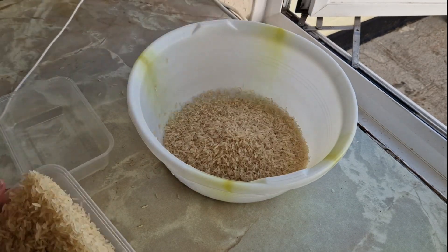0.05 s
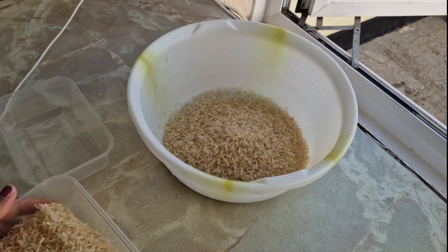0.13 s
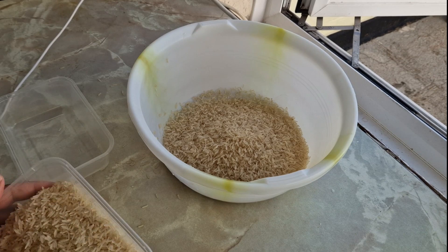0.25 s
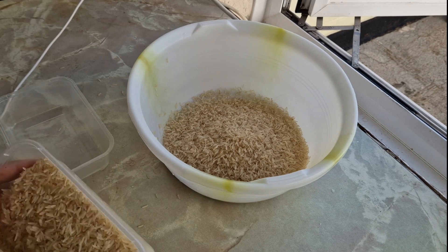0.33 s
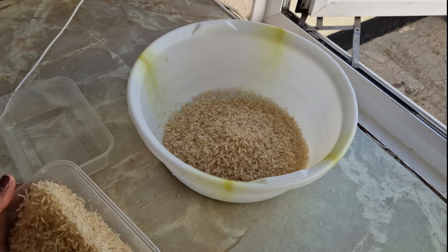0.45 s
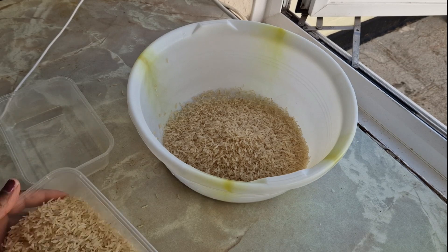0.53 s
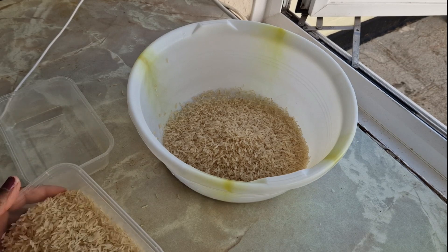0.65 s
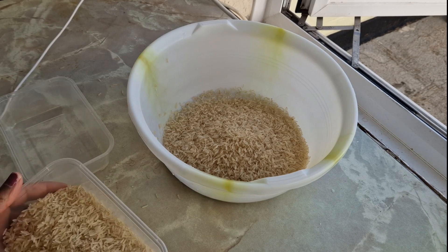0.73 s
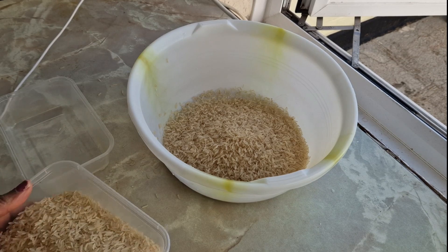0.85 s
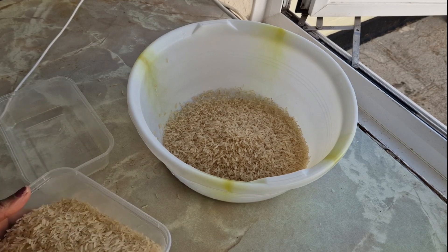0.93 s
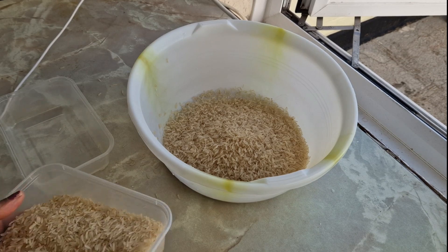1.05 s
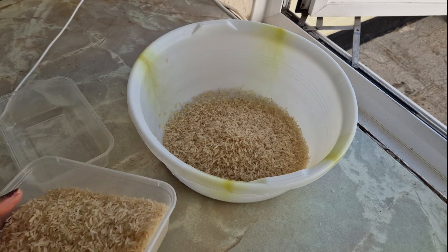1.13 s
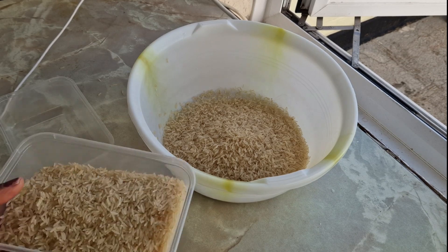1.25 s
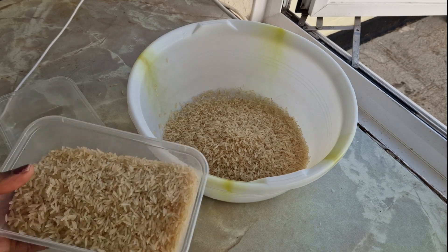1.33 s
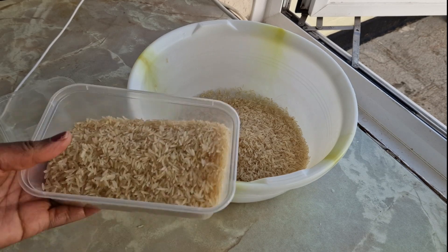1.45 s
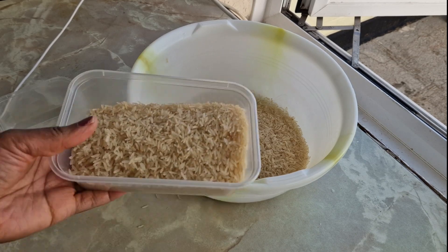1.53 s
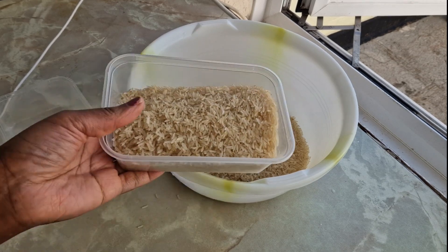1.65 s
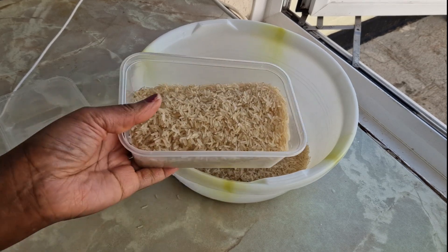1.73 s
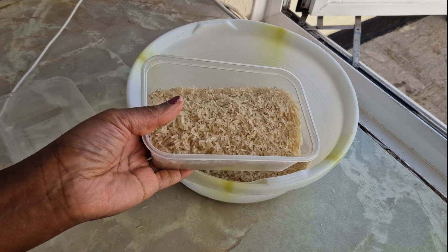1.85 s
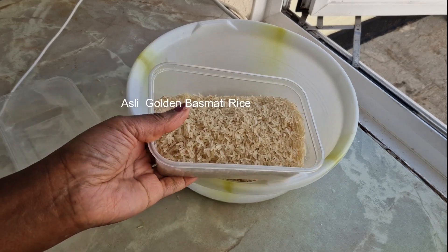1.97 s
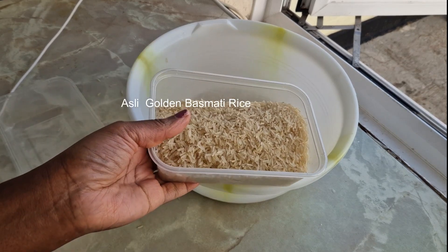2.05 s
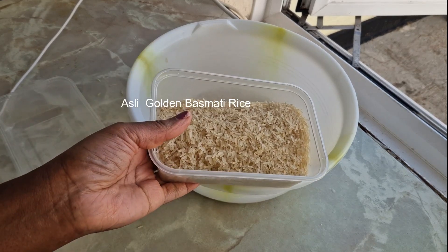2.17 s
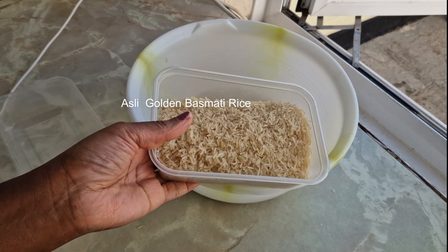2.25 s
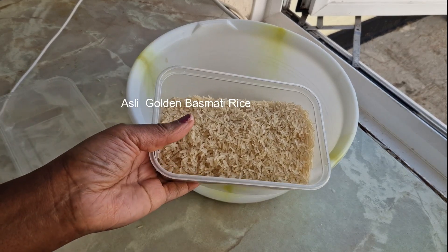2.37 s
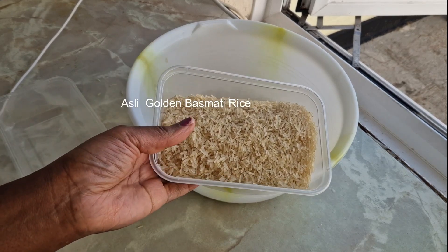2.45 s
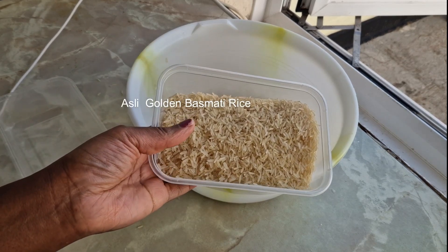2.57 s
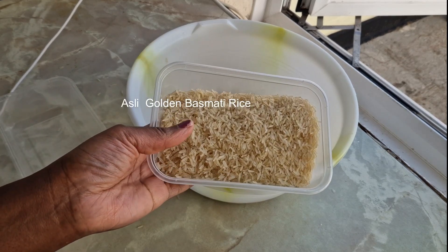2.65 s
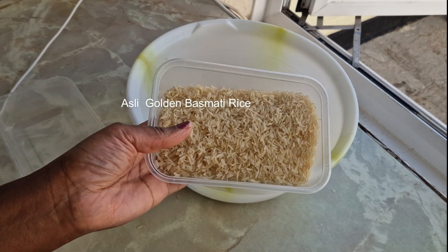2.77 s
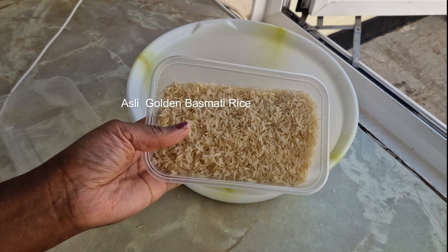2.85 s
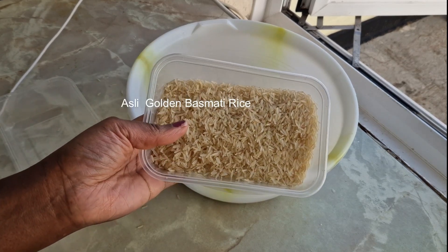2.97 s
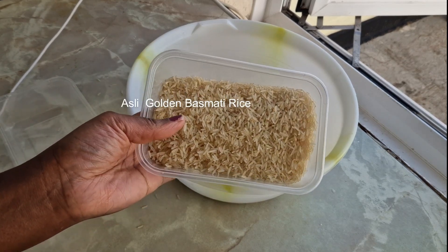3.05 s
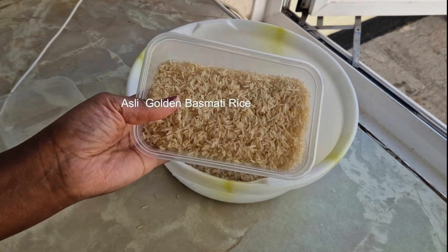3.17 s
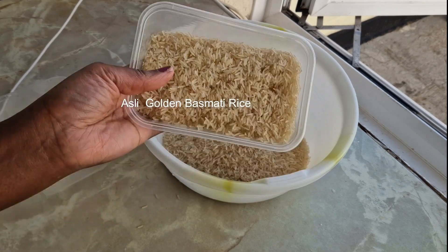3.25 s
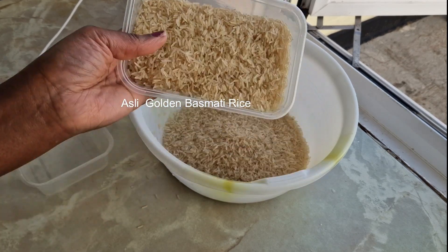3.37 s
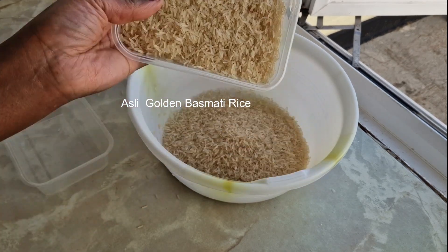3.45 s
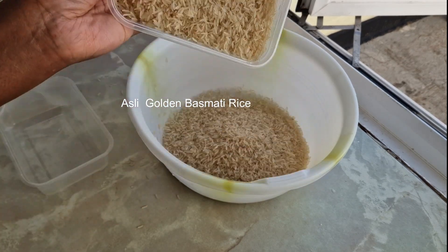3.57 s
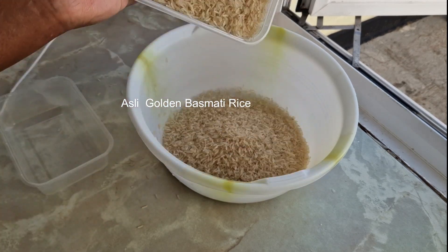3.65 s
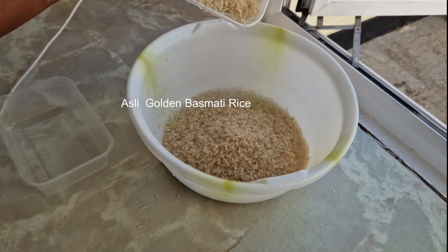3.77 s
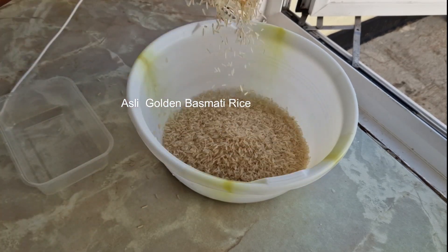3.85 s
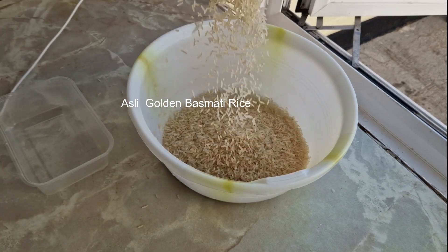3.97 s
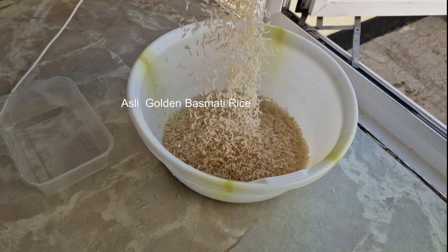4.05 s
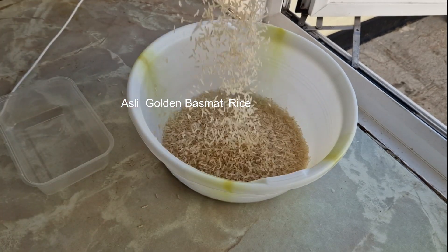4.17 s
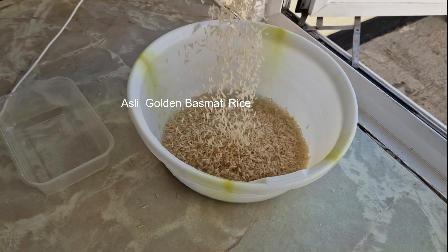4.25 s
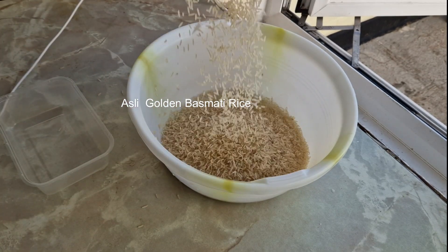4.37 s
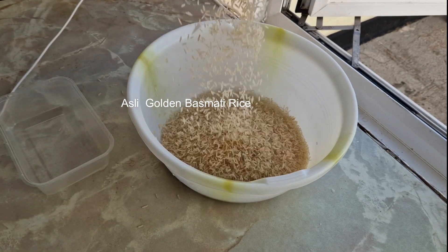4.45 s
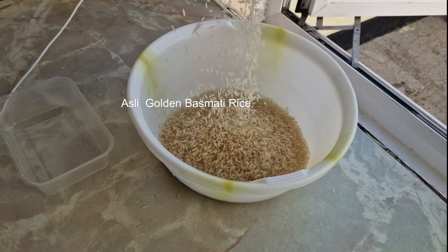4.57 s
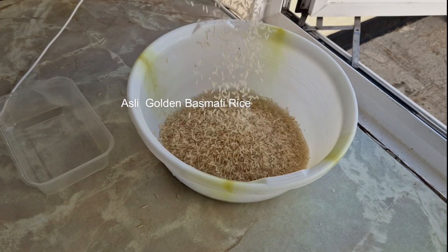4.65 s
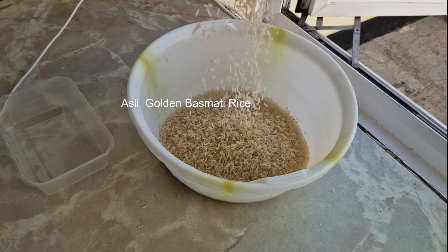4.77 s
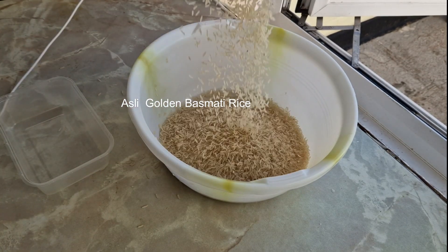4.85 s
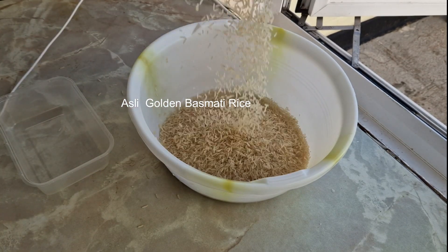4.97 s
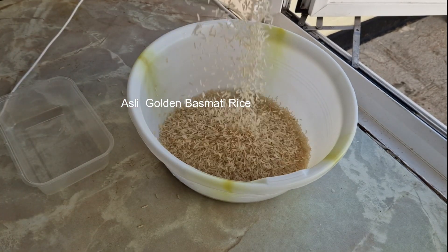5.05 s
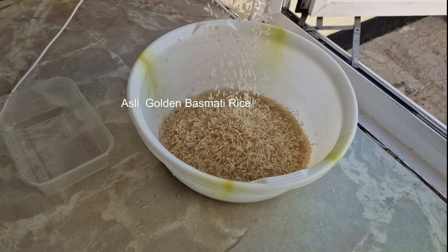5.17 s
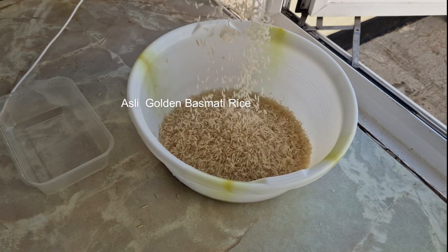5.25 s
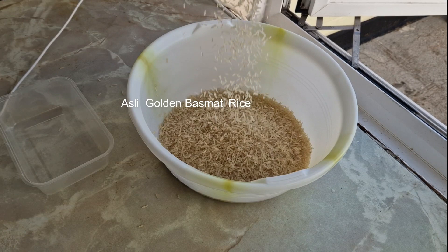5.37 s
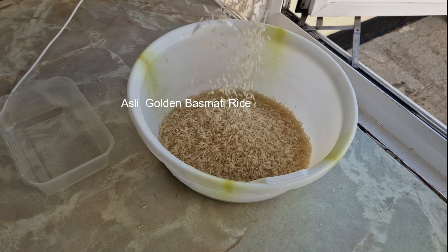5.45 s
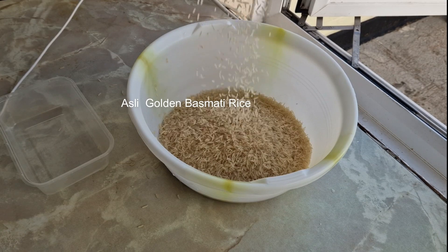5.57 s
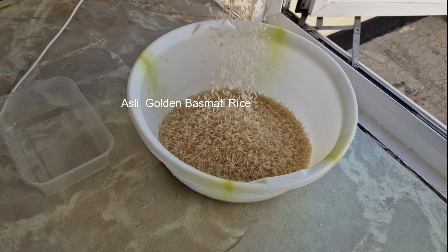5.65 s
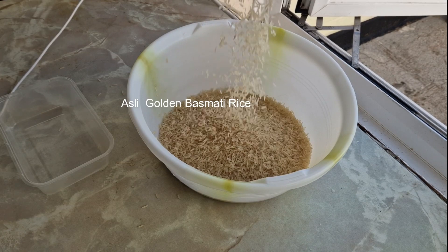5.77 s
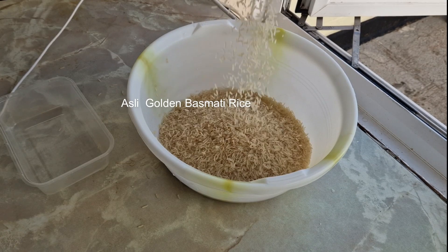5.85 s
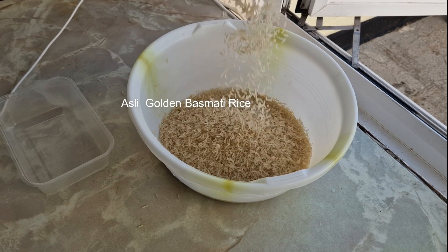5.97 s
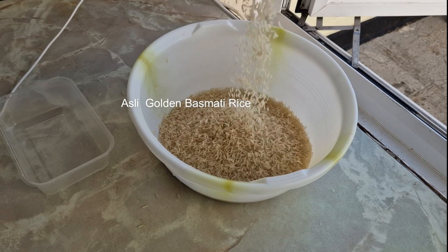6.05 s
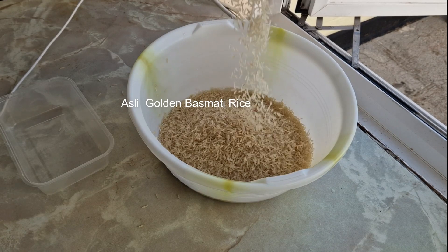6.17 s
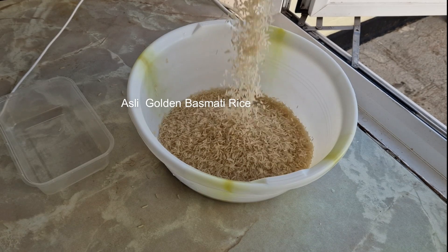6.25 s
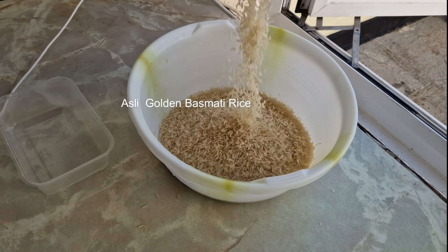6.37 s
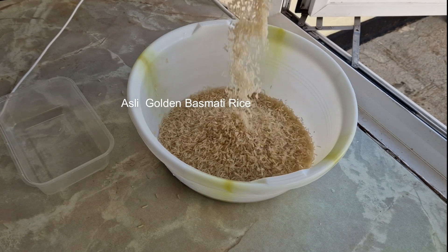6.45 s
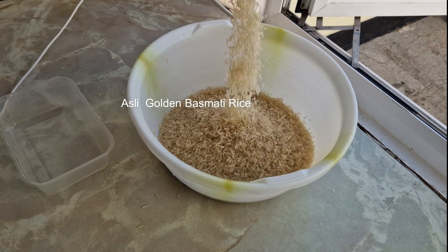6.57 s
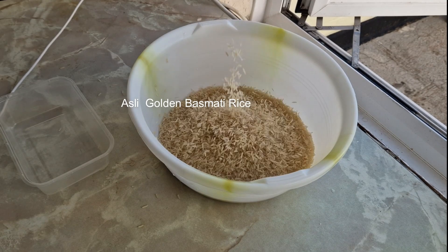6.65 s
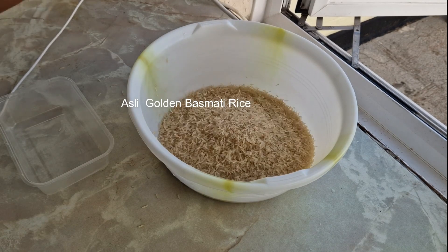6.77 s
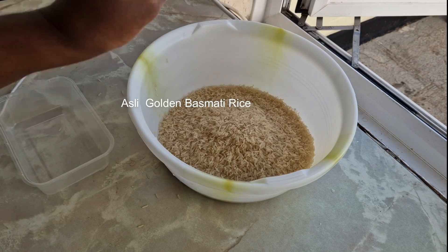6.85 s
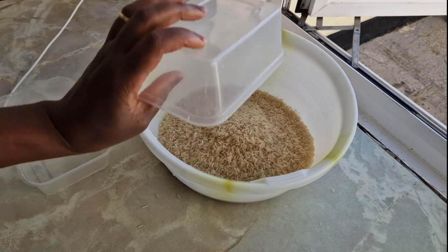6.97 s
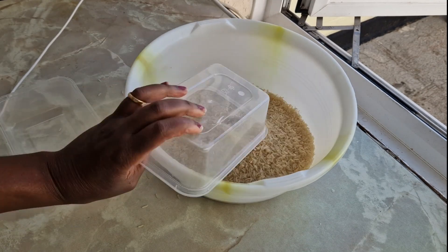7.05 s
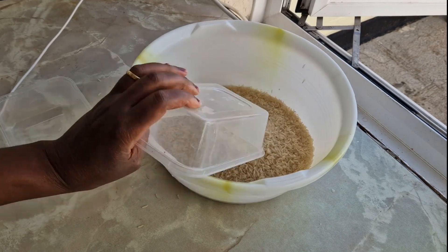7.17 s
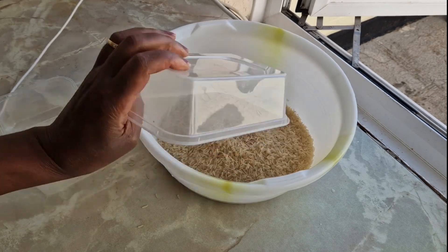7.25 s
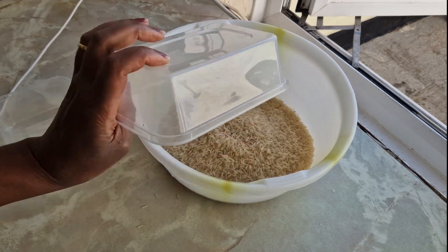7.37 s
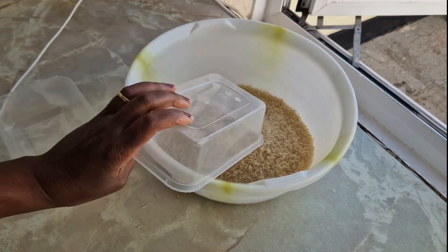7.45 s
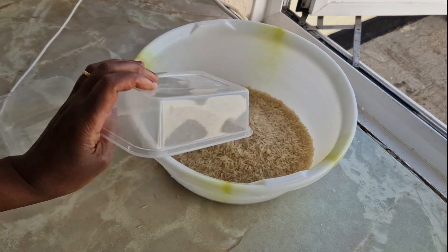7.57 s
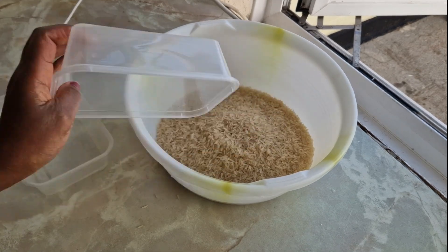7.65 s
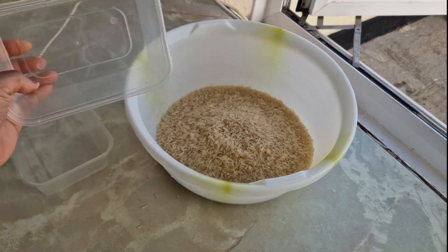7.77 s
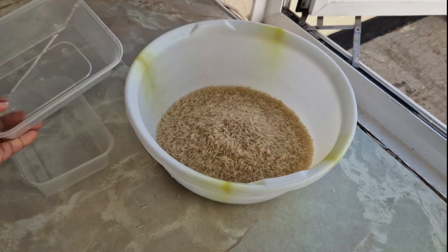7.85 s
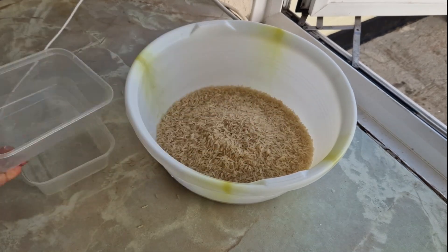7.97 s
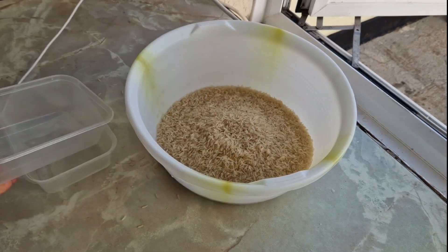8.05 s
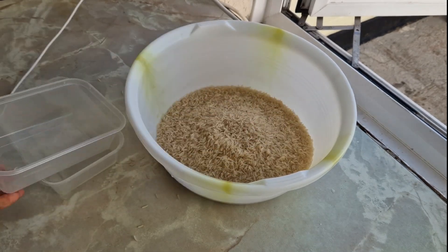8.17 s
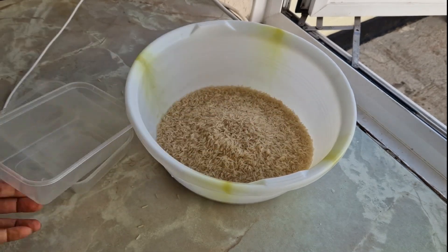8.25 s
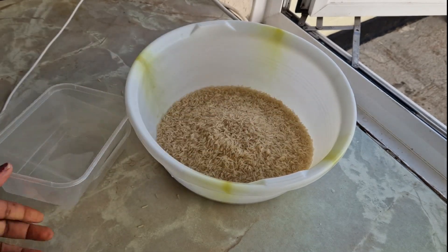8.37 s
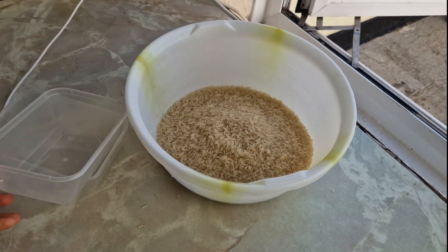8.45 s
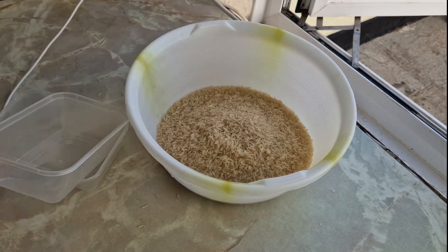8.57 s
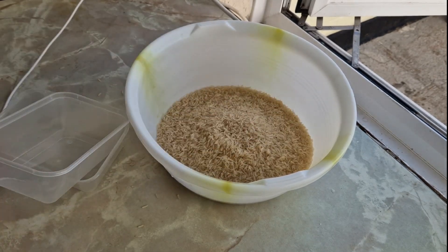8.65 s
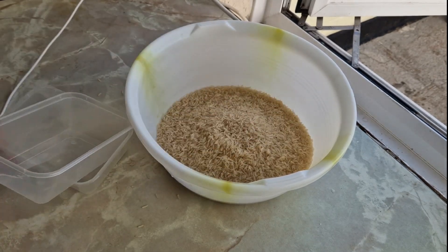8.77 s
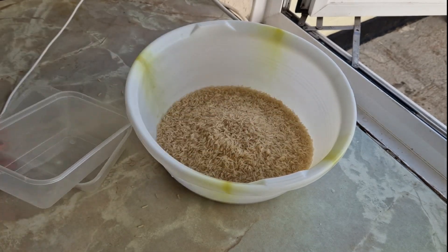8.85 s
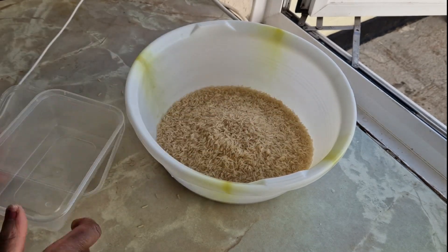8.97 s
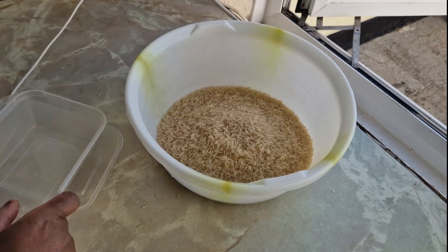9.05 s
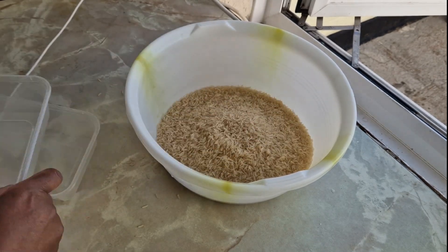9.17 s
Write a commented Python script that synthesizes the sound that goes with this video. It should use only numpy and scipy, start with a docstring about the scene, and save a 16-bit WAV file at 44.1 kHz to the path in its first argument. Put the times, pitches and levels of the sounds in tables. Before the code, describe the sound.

Dry rice is shaken twice in a thin plastic tub, poured pattering into a plastic bowl, then the emptied tub is slapped twice and set down.

```python
"""Dry rice in a thin plastic tub is shaken twice, tipped and poured onto rice in a plastic bowl.
The rice is clumped random grain impacts; lone grains click and excite the walls they strike.
The empty tub is slapped twice to free the last grains and set down inside another tub: blows ring
decaying wall modes under a noisy crack, and rubs are clumped slips.
A small hard room adds decaying reflections; low rumble and faint hiss, filtered noise, lie under all."""
import sys
import numpy as np
from scipy import signal
from scipy.fft import rfft, irfft, next_fast_len
from scipy.io import wavfile

SR = 44100
rng = np.random.default_rng(int(sys.argv[2]) if len(sys.argv) > 2 else 0)


def makeup_ratio(level_db):
    """Linear amplitude ratio for a level in decibels (20 dB per factor of ten)."""
    decades = np.asarray(level_db, float) / 20
    return 10 ** decades


def store_pcm(level_fs):
    """Save levels as 16-bit WAV."""
    pcm = np.round(np.clip(level_fs, -1, 1) * 32767).astype(np.int16)
    wavfile.write(sys.argv[1], SR, np.atleast_2d(pcm).T)


N = 406161
PAD = next_fast_len(N + SR)
HZ = np.maximum(np.arange(PAD // 2 + 1) * SR / PAD, 1)
HALF = np.array([[0.5], [-0.5]])   # shares a left-right difference in dB between the channels


def rms_one(x):
    """Normalization: scales a signal to rms 1."""
    return x / np.sqrt(np.mean(x ** 2) + 1e-20)


def in_time(table):
    """Envelope interpolation: columns over time, the first (dB) falling to silence outside the table."""
    before = (table[0][0] - 0.01, -120.0, *table[0][2:])
    after = (table[-1][0] + 0.01, -120.0, *table[-1][2:])
    s, *columns = np.transpose([before, *table, after])
    return [np.interp(np.arange(N) / SR, s, c) for c in columns]


def strokes(rows, rise, sag, fall):
    """Exponential growth and decay: rows (s, length s, dB) rise, sag and fall at slopes in dB per s."""
    t = np.arange(N) / SR
    power = 0
    for s, length, db in rows:
        growth = rise * np.minimum(t - s, 0)
        loss = sag * np.clip(t - s, 0, length) + fall * np.maximum(t - s - length, 0)
        power = power + makeup_ratio(np.maximum(db + growth - loss, -150)) ** 2
    return 10 * np.log10(power)


def at_hz(points):
    """Spectral interpolation: a (Hz, value) table on a logarithmic frequency axis."""
    hz, value = np.array(points).T
    return np.interp(np.log(HZ), np.log(hz), value)


def flat_top(spectrum):
    """Spectral envelope: gain from a dB table without its last row; the row before holds to the top."""
    return makeup_ratio(at_hz(spectrum[:-1]))


def above(hz):
    """High-pass weighting: a smooth step from 0 to 1 in power at hz."""
    return 1 / (1 + (hz / HZ) ** 8)


# correlation of the left and right channels: f/Hz, correlation
LIKENESS = [(60, 0.97), (130, 1), (290, 0.87), (640, 0.59), (1410, 0.0068), (3100, 0.036), (6820, -0.17),
            (15000, 0.081)]


def shape(pair, gain):
    """Interchannel coherence: colours two unrelated signals, then blends the bass alike, the treble apart."""
    alike = np.clip(at_hz(LIKENESS), -1, 1)
    left, right = rfft(pair, PAD) * gain
    mid = (left + right) * np.sqrt(1 + alike)
    side = (left - right) * np.sqrt(1 - alike)
    return irfft([mid + side, mid - side], PAD)[:, :N] / 2


def drift(rate):
    """Low-pass random process: a slow fluctuation of rms about 1 with its corner near rate in Hz."""
    r = np.exp(-80 * np.pi * rate / SR)   # one step every 40 samples
    slow = signal.lfilter([1], [1, -2 * r, r * r], rng.standard_normal(N // 40 + 2002))[2000:]
    return np.interp(np.arange(N) / 40, np.arange(len(slow)), rms_one(slow))


def bursts(hits, t60, rise=1e-5):
    """Exponential energy decay: each impact is a dying noise burst, independent in each channel."""
    power = signal.lfilter([1], [1, -makeup_ratio(-120 / (t60 * SR))], hits ** 2 + 1e-18)
    swell = np.exp(-1 / (rise * SR))
    envelope = np.sqrt(signal.lfilter([1 - swell], [1, -swell], power))
    return envelope * rng.standard_normal((2, N))


def grains(per_s, spread_db, clump_db, t60):
    """Modulated Poisson process: random impacts of uneven size that arrive in clumps; rms 1."""
    sizes = makeup_ratio(spread_db * np.minimum(rng.exponential(1, N), 5))
    chance = per_s * makeup_ratio(clump_db * (drift(25) + drift(90))) / SR
    return rms_one(bursts(sizes * (rng.random(N) < chance), t60))


def rice(patter_db, middle_db, wall_db, colour, per_s, clumps_per_s, spread_db, clump_db, pan_db):
    """Superposed impacts: grain contacts patter, hard grains click, clumps drum the wall below 2.4 kHz."""
    grain_t60_s = 0.017
    fine = grains(per_s, spread_db, clump_db, grain_t60_s)
    coarse = grains(per_s / 2, spread_db, clump_db, grain_t60_s)
    heavy = grains(clumps_per_s, spread_db, clump_db, t60=0.04)
    sharp = grains(clumps_per_s, spread_db, clump_db, t60=0.003)
    tone = flat_top(colour)
    patter = rms_one(shape(fine + 0.18 * heavy + 0.33 * sharp, tone * np.sqrt(above(7800))))
    middle_band = np.sqrt(above(3170) * (1 - above(6240)))
    middle = rms_one(shape(coarse + 0.5 * fine + 1.77 * heavy + 0.25 * sharp, tone * middle_band))
    wall = rms_one(shape(heavy + 0.59 * coarse, tone * np.sqrt(1 - above(2400))))
    return makeup_ratio(patter_db + HALF * pan_db) * (patter + makeup_ratio(middle_db) * middle + makeup_ratio(wall_db) * wall)


# spectrum of rumble and hiss: f/Hz, level/dB
AIR_COLOUR = [(13, -42), (22, -11.5), (44, 3), (139, -9.5), (477, -25), (518, -25), (897, -23), (1600, -29),
              (2550, -40.5), (3840, -33.5), (5650, -35.5), (6840, -39.5), (10900, -37.5), (12900, -33),
              (15600, -48)]
# humps and a dip in the hiss: f/Hz, width/Hz, level over the rest/dB
AIR_PEAKS = [(129.2, 33, 17.5), (206.6, 24, 8.5), (292.5, 11, 11.5), (525, 81, 8), (667, 5.3, 13.5),
             (1595, 145, 7.5), (3890, 135, 11.5), (4790, 25, 11), (5750, 430, 10), (7530, 120, 14),
             (9200, 140, 6), (11900, 90, 14), (12000, 210, -1), (12950, 510, 12), (15500, 190, -17)]
# how far the humps stand out: t/s, share
HUMPS_SHARE = [(0, 1), (3, 0.98), (7.7, 0.72), (9.21, 0.75)]
# low rumble: t/s, level/dB
RUMBLE = [(0.0, -47), (0.51, -42.5), (1.9, -46), (2.1, -45), (3.54, -47.5), (6.9, -47.5), (7.13, -45.5),
          (7.67, -50.5), (9.21, -49)]


def air():
    """Filtered noise: a wavering rumble and a hiss with resonance-shaped humps that fade a little."""
    t = np.arange(N) / SR
    humps_db = sum(db / (1 + (2 * (HZ - hz) / width) ** 2) for hz, width, db in AIR_PEAKS)
    white, gain = rng.standard_normal((2, N)), flat_top(AIR_COLOUR)
    plain = shape(white, gain * np.sqrt(above(420)))
    humped = shape(white, gain * makeup_ratio(humps_db) * np.sqrt(above(229.4)))
    share = np.interp(t, *np.transpose(HUMPS_SHARE))
    hiss = rms_one(plain + share * (humped - plain))
    rumble = rms_one(shape(white, gain * np.sqrt(1 - above(183))))
    rumble_db = np.interp(t, *np.transpose(RUMBLE))
    return makeup_ratio(-50.5 + 0.18 * drift(23)) * hiss + makeup_ratio(rumble_db + 0.27 * drift(0.96)) * rumble


# the full tub jerked twice: t/s, patter level/dB, middle re patter/dB, tub wall re patter/dB
SHAKE = [(0.0, -54, 3, -1), (0.07, -54.5, 5, 0), (0.095, -32.5, -2.5, -9), (0.12, -16, -5.5, -15),
         (0.136, -13, -7, -13.5), (0.168, -14.5, -7, -9.5), (0.212, -17, -11, -20), (0.244, -29, -9, -16),
         (0.304, -44.5, -1, -11), (0.386, -60, 6, 4), (0.436, -42, 0, -3), (0.456, -35.5, 1, -11),
         (0.473, -20.5, -4.5, -11.5), (0.479, -15, -1, -13.5), (0.5, -15, -9.5, -13.5),
         (0.526, -14.5, -8.5, -9), (0.564, -17.5, -8.5, -16.5), (0.59, -24.5, -8, -12),
         (0.634, -34, -6, -19), (0.7, -56, -5, -2), (0.9, -49, -20, -16)]
# last grains knocked loose by a slap: t/s, patter level/dB
LOOSENED = [(7.103, -30), (7.521, -35.5)]
# spectrum of rice in the tub: f/Hz, level/dB
SHAKE_COLOUR = [(180, -48), (300, -24), (411, -18), (674, -10), (864, -6.5), (1050, 0.5), (1520, -2.5),
                (1850, -8.5), (2010, -5), (2700, -11.5), (2940, -8), (4510, -6), (8050, -5), (11800, -3.5),
                (15600, -5)]


def shaken_rice():
    """Granular collisions: rice jerked in the tub, and grains loosened by slaps dying exponentially."""
    jerk_db, jerk_middle_db, jerk_wall_db = in_time(SHAKE)
    loose_db = strokes([(s, 0, db) for s, db in LOOSENED], rise=3000, sag=0, fall=140)
    jerked = jerk_db > loose_db
    middle_db = np.where(jerked, jerk_middle_db, -6)
    wall_db = np.where(jerked, jerk_wall_db, -4)
    return rice(np.maximum(jerk_db, loose_db), middle_db, wall_db, SHAKE_COLOUR,
                per_s=5000, clumps_per_s=900, spread_db=2.0, clump_db=1.5, pan_db=2.5)


# moments when the rice hits the wall: t/s, level/dB (the trickle lies 30.5 dB under it)
JERKS = [(0.129, -21), (0.484, -9.5)]


def settling():
    """Granular creep: grains slide over grains before and after each jerk in a thin bright trickle."""
    level_db = strokes([(s, 0, db - 30.5) for s, db in JERKS], rise=62, sag=0, fall=17)
    creep = grains(400, spread_db=1.5, clump_db=3.5, t60=0.019)
    return makeup_ratio(level_db) * rms_one(shape(creep, flat_top(SHAKE_COLOUR) * np.sqrt(0.4 + above(7200))))


def room(x):
    """Diffuse reverberation: dense reflections die exponentially, duller than the direct sound."""
    t60_s, level_db = 0.27, -4.5
    t = np.arange(SR // 2) / SR
    echoes = rng.standard_normal((2, len(t))) * makeup_ratio(-60 * t / t60_s) * (t > 0.006)
    tail = signal.fftconvolve(x.mean(axis=0, keepdims=True), echoes, axes=1)[:, :N]
    duller = np.sqrt(1 / (1 + (HZ / 3000) ** 2))
    return makeup_ratio(level_db) * shape(tail, duller) / np.sqrt(t60_s * SR / np.log(1e6))   # by echo energy


# single grains that stand out: t/s, click level/dB, left-right/dB,
# wall re click/dB (low where the grain lands on rice)
TICKS = [(0.349, -31, 7, 0), (0.358, -36, 6, 6), (0.476, -22, 1, 0), (0.758, -27, 1, -12),
         (0.883, -40, 4, -20), (0.937, -32, -4, -5), (0.9662, -33, 0, -6), (1.015, -30, 2, -7),
         (1.065, -34.5, 0, 4), (1.15, -29.5, -2, -12), (1.226, -31, 1, -18), (1.239, -26.5, -1, -10),
         (1.301, -34, 3, -5), (1.3335, -33, -4, -20), (1.3995, -39, 1, -17), (1.4196, -34, 5, -20),
         (1.451, -35, 0, -20), (3.1113, -30, 0, -14), (3.1273, -25, 1, -2.5), (3.1805, -30, 0, -8),
         (3.2198, -24, 0, -17), (3.246, -30, 0, 2), (3.29, -26, 0, 2), (3.32, -25, 0, 2),
         (3.3626, -31, 0, 6), (3.379, -26, 0, 0), (3.543, -31, -2, -14), (3.628, -32.5, 1, 5.5),
         (3.7108, -29, 0, 0), (3.9628, -38, 5, 7), (4.0654, -24.5, 2, 1.5), (4.1093, -30, 3, 3),
         (4.1192, -19.5, 2, 0.5), (4.148, -20, 2, -1), (4.214, -28, 5, 6), (4.233, -21.5, 0, 5),
         (4.258, -26, 3, 6.5), (4.333, -21.5, 2, 2), (4.365, -22, 0, -4), (4.3863, -28, 0, 3),
         (4.404, -22, 4, -7), (4.4311, -25, 2, -13), (4.4725, -34, 0, -6), (4.5396, -27, 0, -5),
         (4.6226, -21, 1, 2), (4.6616, -18.5, 0, -2), (4.696, -20, 0, -6), (4.9032, -36, 0, -2),
         (4.9474, -32, -4, -6), (4.9716, -20, 6, -13), (4.9981, -19, 0, -8), (5.0757, -19, 2, -2),
         (5.093, -18, 3, -3), (5.1537, -20, 4, 1.5), (5.176, -19.5, 2, 3), (5.251, -30, 0, -4),
         (5.2628, -29, -2, 6), (5.336, -28, 0, -10), (5.377, -17.5, -2, -6), (5.4478, -25, 4, -2),
         (5.457, -27, 0, -8), (5.4831, -27, 5, -1), (5.627, -21.5, 3, 0), (5.719, -29, 3, -9),
         (5.7495, -33, 4, 3), (5.827, -24, 0, -9), (5.9182, -27, 0, -13), (5.9538, -31, 4, 5),
         (6.017, -24.5, 4, -0.5), (6.0409, -22, 0, 3), (6.0466, -31, 0, 0), (6.0677, -21.5, 0, 5),
         (6.080, -22, -2, -5), (6.177, -25, 2, -6), (6.187, -22, 3, 5.5), (6.214, -20.5, 0, -3),
         (6.264, -22, 3, 1), (6.27, -28, -5, 1), (6.282, -19, 0, -1), (6.3257, -23, 3, -2),
         (6.3921, -30, 0, -9), (6.425, -30, 6, 0), (6.4621, -16, -2, -0.5), (6.5364, -19, 3, -3),
         (6.6294, -22, 1, 3.5), (6.6628, -23, 0, 0), (6.685, -19, 1, 0), (6.7379, -24, 4, 9.5),
         (7.1753, -17.5, -1, -3), (7.234, -24, 0, 0), (7.25, -27.5, 2.5, -6), (7.2874, -32.5, 3, 1),
         (7.329, -35, 0, 3.5), (7.351, -39, 0, -2), (7.428, -36, 0, -12), (7.763, -43, 0, -9),
         (7.9433, -27, -3, -16), (8.1117, -37, 4, 12), (8.5376, -42, 2, -10), (8.567, -41, 4, -10),
         (9.0479, -45, 2, -10)]


def ticks():
    """Impact excitation: lone grains tick brightly; on bare plastic the wall answers duller and longer."""
    s, db, pan_db, wall_db = np.transpose(TICKS)
    at = (s * SR).astype(int)
    # stray grains bounce off at random, following the patter of tipping and pouring
    strays_per_s = 120
    patter_db = np.maximum(in_time(TIP)[0], in_time(POUR)[0])
    size_db = patter_db + 6.5 - 2 * np.minimum(rng.exponential(1, N), 2)
    clicks = makeup_ratio(size_db + HALF * rng.normal(1, 5.5, N)) * (rng.random(N) < strays_per_s / SR)
    clicks[:, at] = makeup_ratio(db + HALF * pan_db)
    wall = makeup_ratio(-2.5 + 4 * rng.uniform(-0.58, 1, N))
    wall[at] = makeup_ratio(wall_db)
    struck = clicks * wall
    tone = flat_top(POUR_COLOUR)
    bright = shape(bursts(clicks, t60=0.016, rise=0.0006), tone * np.sqrt(above(5000)))
    middle = shape(bursts(struck, t60=0.11), tone * np.sqrt(above(1970) * (1 - above(5200))))
    low = shape(bursts(struck, t60=0.016), tone * np.sqrt(above(1550) * (1 - above(2160))))
    ringing = bowl(struck * (np.arange(N) > POUR[0][0] * SR))   # from the start of pouring
    return bright + ringing + makeup_ratio(-3.5) * middle + makeup_ratio(2.5) * low


# slaps and touches on the tub: t/s, peak level/dB, crack re ring/dB, brightness/(dB per octave),
# left-right/dB, damping by the hand (multiplies the decay rate)
KNOCKS = [(2.0202, -20.5, -32, 4, 0, 2.2), (7.069, -26.5, 1, -2, 3, 1.8), (7.0768, 3, -8, 4, -2, 1.07),
          (7.142, -9.5, -6.5, 3, 3, 3.3), (7.4719, -23, -7, 5, 4, 0.61), (7.4963, -3, -7, 9.5, -2, 3),
          (7.4997, 2, -26, 2.5, 2, 3.1), (7.529, -20, -21, -17, -1, 1.3), (7.543, -16, -9, 8.5, 4, 3.1),
          (8.0188, -12, -3.5, 7.5, 3.5, 1.6), (8.032, -42, -6, 10, 1, 2.2), (8.0435, -28, -6, 14, 6, 1.9),
          (8.072, -29, -3, 3, 1, 2.3), (8.087, -27.5, 0.5, 3, 5, 1.8), (8.147, -22.5, -6, 4, 5, 2.4),
          (8.158, -27, -17, 2, 2, 1.6), (8.2506, -31, -9, 6, 6, 2), (8.2605, -36, -1, 0, 7, 2.4),
          (8.268, -35, -14, 2, 1, 1.8), (8.897, -33, -2.5, 4.5, 5, 1.5), (9.074, -38, -3, 1, 2, 2.9),
          (9.092, -30, -5, 7, 6, 1.7), (9.1075, -36, -1, 9, -2, 2.6), (9.116, -23.5, -12, 4.5, 2, 3.2)]
# tub wall modes: f/Hz, level/dB, t60/s at damping 1
TUB = [(167, -13, 0.096), (222, -3, .13), (262, -10, 0.077), (306, 3, 0.11), (341, 6, 0.068),
       (383, 3, 0.092), (427, 0, 0.09), (464, 9, 0.057), (482, -8, 0.12), (546.4, 5.5, 0.16),
       (607, 1.5, 0.14), (658, 2, 0.13), (760, 8, 0.048), (820, -8, 0.13), (854, -9, 0.13),
       (932, -2.5, 0.22), (1097, 0, 0.074), (1252, 4, 0.087), (1336, 0.5, 0.1), (1416, 1, 0.045),
       (1460, -11, 0.076), (1536, -8, .09), (1654, -7, 0.087), (1840, -16, 0.047), (1900, -24, 0.061),
       (2350, -11, 0.044), (2448, 0, 0.036), (2750, -10.5, .04), (2950, -28, 0.017), (3090, -4, 0.023)]


def tub():
    """Modal radiation: a soft push and its rattle ring the wall modes; a hard edge adds a bright crack."""
    out, t = np.zeros((2, N + SR)), np.arange(SR // 2) / SR
    contact_s, onset_s = 0.051e-3, 0.0007
    hz, mode_db, t60 = np.repeat(np.transpose(TUB), 3, axis=1)[:, :, None]   # a bent wall splits each mode
    partner = np.resize([-1, 0, 1], hz.shape)
    mode_db = mode_db - 3 * np.abs(partner)   # split partners lie under the mode
    treble_left = makeup_ratio(1.5 * np.log2(hz / 350) * HALF[:, :, None])   # 1.5 dB per octave
    thin = signal.butter(4, 140, "high", fs=SR, output="sos")   # a small thin wall radiates no bass
    dull = signal.butter(2, 5800, fs=SR, output="sos")
    crack_band = signal.butter(2, 1300, "high", fs=SR, output="sos")
    push_t = t[:SR // 100]
    push = push_t * np.exp(-push_t / contact_s)
    for s, db, crack_db, tilt_db, pan_db, damping in KNOCKS:
        split = hz * (1 + 0.012 * partner + rng.normal(0, 0.003, hz.shape))
        strength_db = mode_db + tilt_db * np.log2(hz / 500) + rng.normal(0, 1.0, hz.shape)
        decay = makeup_ratio(strength_db - 60 * t * damping / t60)
        # high modes reach the two channels out of step
        lag = np.clip((hz / 1100) ** 1.2, 0, 0.8) * rng.choice([-1, 1], hz.shape) * [[[1]], [[-1]]]
        modes = decay * treble_left * np.sin(2 * np.pi * split * t + lag)
        body = np.sum(modes, axis=1) * np.minimum(t / onset_s, 1)
        rattle = makeup_ratio(-30 - 60 * t[1:] / 0.08) * rng.standard_normal(len(t) - 1)
        force = np.convolve(np.append(1, rattle), push)
        ring = signal.fftconvolve(body, force[None, :len(t)], axes=1)[:, :len(t)]
        ring = signal.sosfilt(thin, ring)
        # the crack: a short bright edge and a longer duller tail
        edge, tail = rng.standard_normal((2, 2, len(t)))
        tail = signal.sosfilt(dull, tail)
        crack = edge * makeup_ratio(-60 * t / 0.093) + tail * makeup_ratio(3.5 - 60 * t / 0.11)
        crack = signal.sosfilt(crack_band, crack)
        blow = ring / np.abs(ring).max() + makeup_ratio(crack_db) * crack / np.abs(crack).max()
        i = round(s * SR)
        out[:, i:i + len(t)] += makeup_ratio(db + HALF * pan_db) * blow
    return out[:, :N]


# rice starting to slip as the tub is tipped: t/s, patter level/dB, tub wall re patter/dB
TIP = [(3.05, -57, -9), (3.102, -67, -7), (3.11, -50, 1), (3.214, -52, -13), (3.22, -36, -14),
       (3.266, -39, -1.5), (3.422, -40, -10.5), (3.502, -53, -44), (3.548, -46, -3), (3.62, -49.5, -7),
       (3.635, -42.5, -13), (3.716, -37.5, -18), (3.82, -38, -13), (3.88, -44.5, -13), (4.04, -51, -8)]
# spectrum of the slipping rice: f/Hz, level/dB
TIP_COLOUR = [(350, -48), (600, -43), (651, -36), (916, -34), (967, -18), (1110, -17), (1420, -20),
              (1520, -39), (3340, -7.5), (5390, 5.5), (8110, 3), (12400, 7), (15600, -6)]


def tipped_rice():
    """Granular avalanching: slipping rice is a sparse run of uneven grain impacts on the tub wall."""
    patter_db, wall_db = in_time(TIP)
    return rice(patter_db, -14.5, wall_db, TIP_COLOUR,
                per_s=3500, clumps_per_s=350, spread_db=3.0, clump_db=1.9, pan_db=1.0)


# rice stream landing in the bowl: t/s, patter level/dB, bowl wall re patter/dB
POUR = [(4.02, -58, -12), (4.13, -40, -11), (4.21, -34, -10), (4.31, -34, -8), (4.36, -37, -9.5),
        (4.41, -35, -7.5), (4.47, -38, -12), (4.56, -36.5, -9), (4.62, -36, -11.5), (4.72, -38, -11),
        (4.86, -39, -11), (5.0, -36, -8), (5.08, -30, -17), (5.13, -30, -14.5), (5.18, -31, -14),
        (5.24, -33.5, -12), (5.27, -29, -23), (5.32, -39.5, -9.5), (5.5, -39, -12), (5.62, -39, -9),
        (5.72, -40.5, -11.5), (5.88, -39.5, -10.5), (6.0, -37.5, -9), (6.08, -37, -7), (6.11, -37.5, -11),
        (6.17, -36.5, -8), (6.22, -34, -10.5), (6.29, -33, -9.5), (6.36, -34.5, -8.5), (6.44, -35, -10),
        (6.46, -32, -11.5), (6.59, -29, -13.5), (6.64, -37, -11), (6.74, -28.5, -14), (6.81, -37.5, -7),
        (6.84, -34, -14.5), (6.99, -60.5, -6), (7.02, -78, 6)]
# spectrum of the landing rice: f/Hz, level/dB
POUR_COLOUR = [(350, -11.5), (700, -11.5), (1020, -7.5), (1180, -8), (1340, -2), (1860, -5.5), (2350, -4),
               (2620, -7), (4100, -8.5), (4760, -9.5), (7370, -3.5), (10800, -3), (11900, -0.5),
               (12900, -0.5), (14200, -2.5), (15600, -6)]


def poured_rice():
    """Granular flow: the landing stream is a dense run of random impacts on rice and bowl."""
    patter_db, wall_db = in_time(POUR)
    return rice(patter_db, -7.5, wall_db, POUR_COLOUR,
                per_s=5000, clumps_per_s=350, spread_db=3.5, clump_db=0.94, pan_db=0.9)


# bowl wall modes: f/Hz, relative level/dB, t60/s
BOWL = [(1272, -6, 0.062), (1360, -4.5, 0.056), (1520, 0, 0.041), (1600, -7.5, 0.049), (1736, -8, 0.027),
        (2050, -6, 0.029), (2274, -4, 0.059), (2545, 0, 0.01), (2964, -3, .025), (3540, -8.5, 0.045),
        (3970, -16, .015), (5000, 2, .012)]


def bowl(clicks):
    """Modal resonance: each grain on bare plastic strikes every wall mode with a strength of its own."""
    out = np.zeros((2, N))
    for hz, db, t60 in BOWL:
        r, w = makeup_ratio(-60 / (t60 * SR)), 2 * np.pi * hz / SR
        strength = makeup_ratio(db + 4 * np.clip(rng.standard_normal(N), -2, 1.5))
        strength = strength * rng.choice([-1, 1], (2, N))
        resonator = [1, -2 * r * np.cos(w), r * r]
        out += signal.lfilter([0, np.sin(w)], resonator, clicks * strength + 1e-18)
    return makeup_ratio(-19.5) * out


# low thumps after the slaps, perhaps the counter or the bowl: t/s, level/dB, f/Hz, rise/s, t60/s
THUMPS = [(7.114, -17.5, 67.8, 0.066, 0.26), (7.136, -26, 132.5, 0.015, 0.29),
          (7.522, -27.5, 162.5, 0.019, 0.26), (7.541, -24, 75.4, 0.027, 0.13),
          (8.03, -33, 127, 0.011, 0.12)]


def thumps():
    """Damped oscillation: each thump is a low sine that swells briefly and dies exponentially."""
    t = np.arange(N) / SR
    out = np.zeros(N)
    for s, db, hz, rise, t60 in THUMPS:
        envelope = makeup_ratio(db - 60 * np.maximum(t - s, 0) / t60) * np.clip((t - s) / rise, 0, 1)
        out += envelope * np.sin(2 * np.pi * hz * (t - s))
    return out


# rubs of the tub on the other tub: t/s, length/s, level/dB
DRAG = [(8.03, 0.15, -35.5), (8.155, .04, -48), (8.26, 0.041, -45.5), (8.905, 0.017, -51),
        (9.025, 0.03, -58), (9.054, 0.024, -45.5), (9.12, 0.012, -43.5)]
# spectrum of the rubbing: f/Hz, level/dB
DRAG_COLOUR = [(88, -33), (150, 8), (314, -34), (428, -10), (530, -2.5), (1220, 0), (2770, -15.5),
               (3300, -16), (15600, -26)]


def drag():
    """Frictional slip: plastic rubbing on plastic gives uneven, clumped slips."""
    level_db = strokes(DRAG, rise=1000, sag=81, fall=180)
    slips = grains(1500, spread_db=2.0, clump_db=1.2, t60=0.025)
    return makeup_ratio(level_db) * rms_one(shape(slips, flat_top(DRAG_COLOUR)))


def scene():
    """Superposition: all near sources, their reflections in the room, and the air."""
    grain_sounds = shaken_rice() + settling() + ticks() + tipped_rice() + poured_rice()
    near = grain_sounds + tub() + thumps() + drag()
    return near + room(near) + air()


def top_cut(x):
    """Nothing passes above the cut-off."""
    return signal.sosfilt(signal.butter(12, 16990, fs=SR, output="sos"), x)


def record(dry):
    """Saturation and band limiting: peaks are rounded, then the top is cut above 15.72 kHz."""
    rounded = np.tanh(dry)
    low_pass = signal.ellip(8, 0.5, 38, 15720, fs=SR, output="sos")
    mix = signal.sosfilt(low_pass, rounded)
    return top_cut(mix)


dry = scene()
out = record(dry)
store_pcm(out)
```